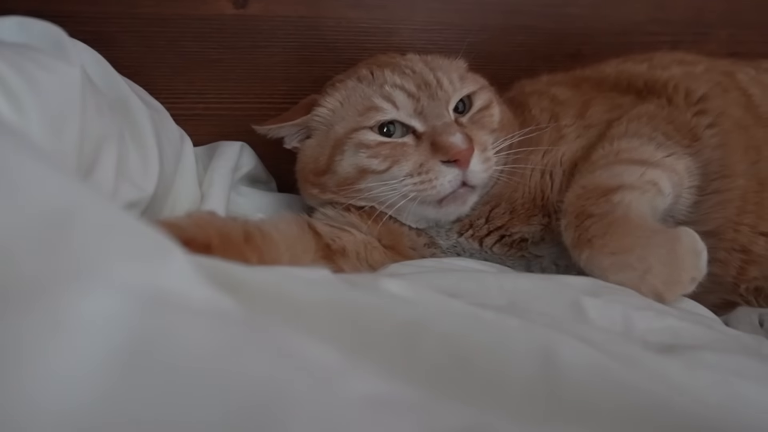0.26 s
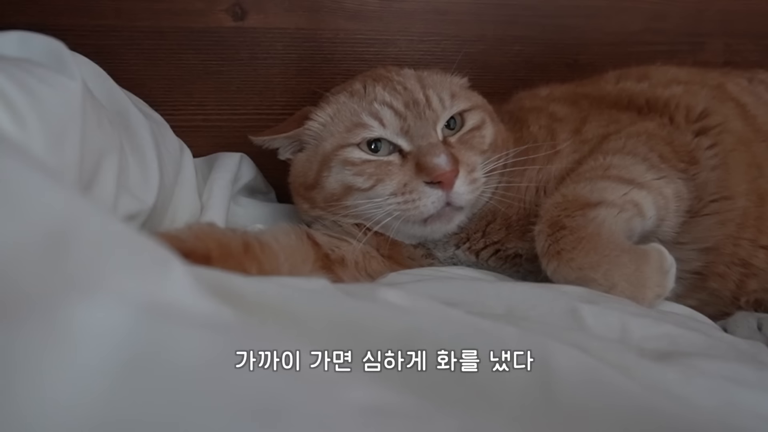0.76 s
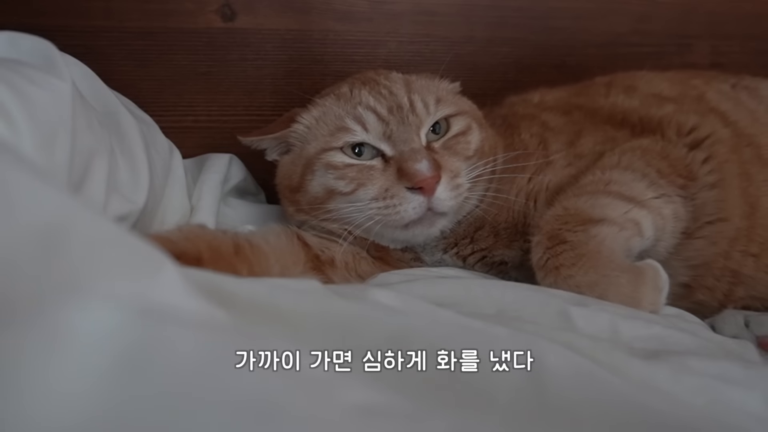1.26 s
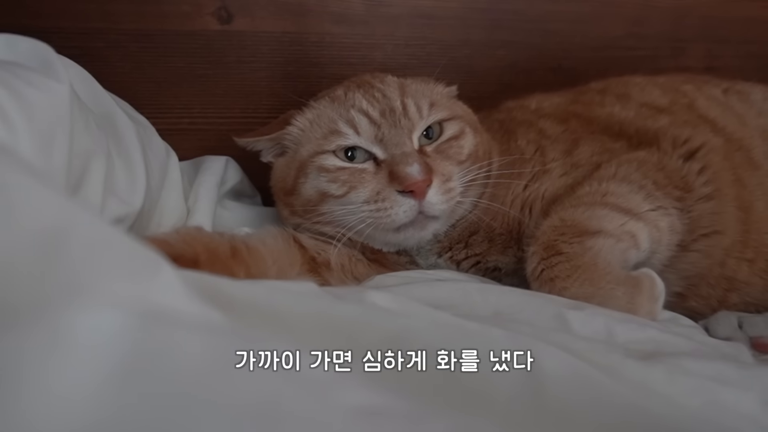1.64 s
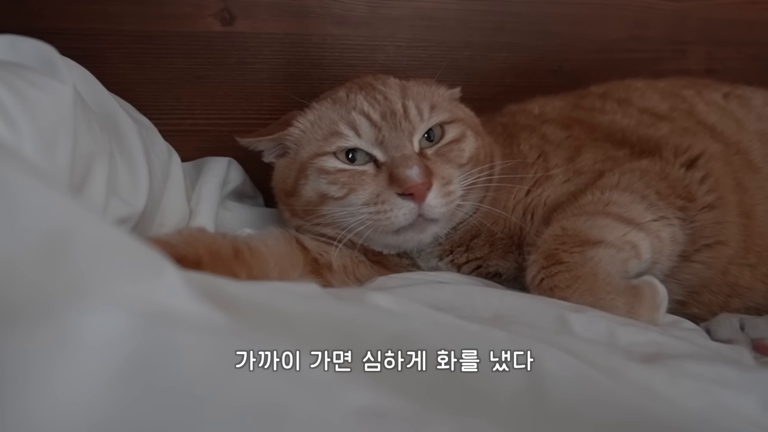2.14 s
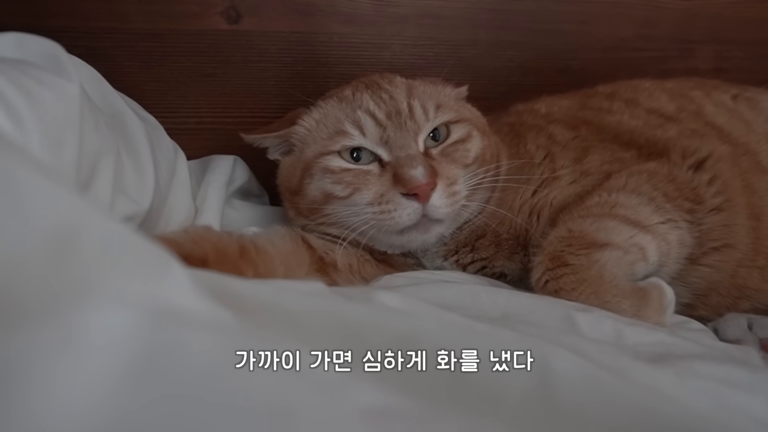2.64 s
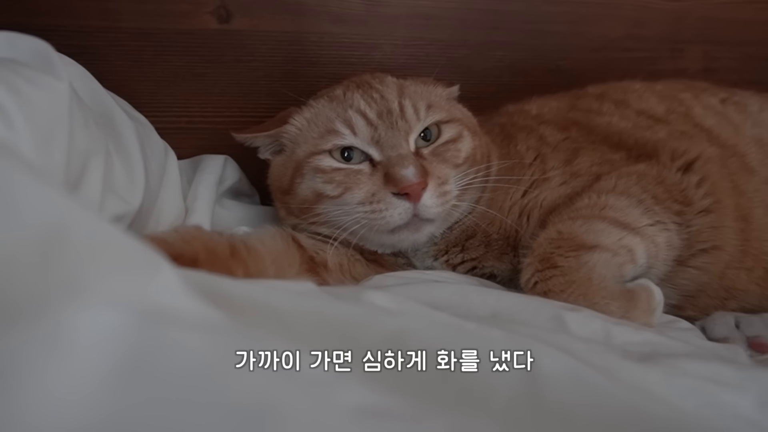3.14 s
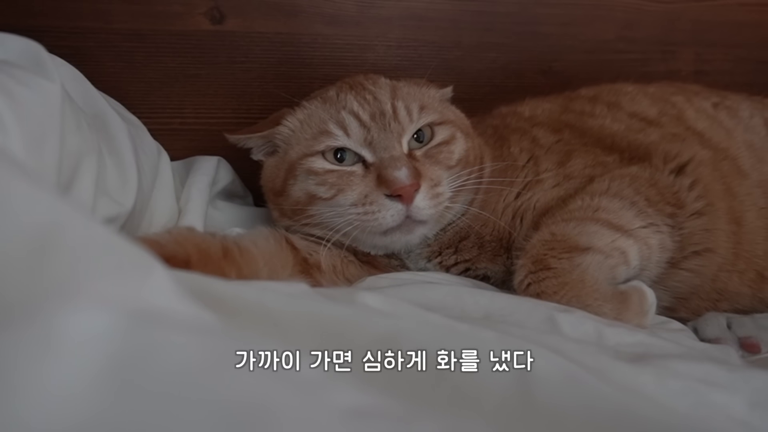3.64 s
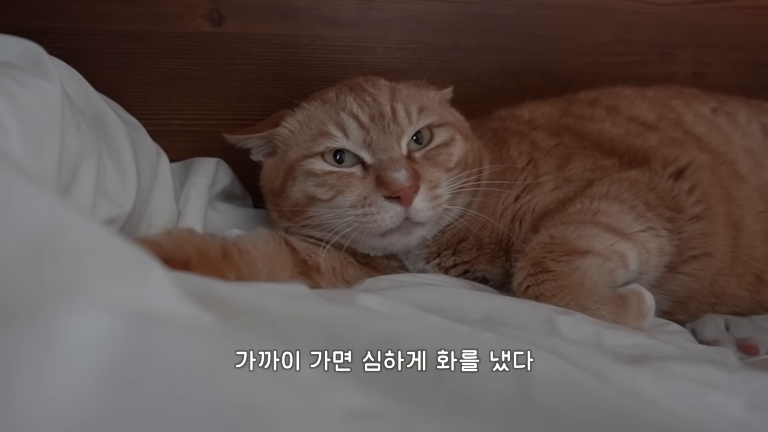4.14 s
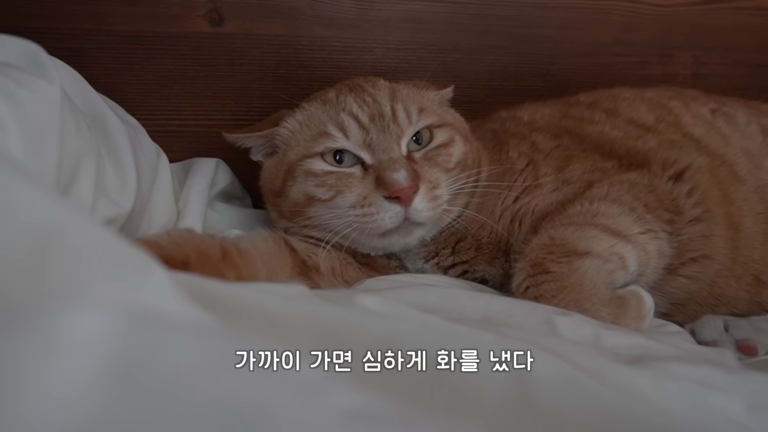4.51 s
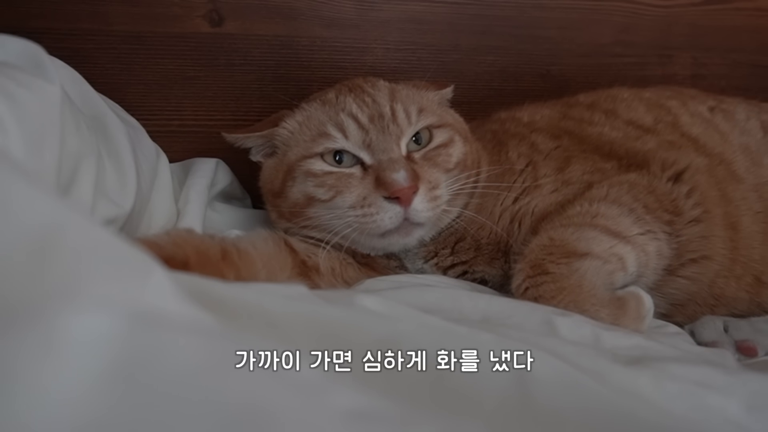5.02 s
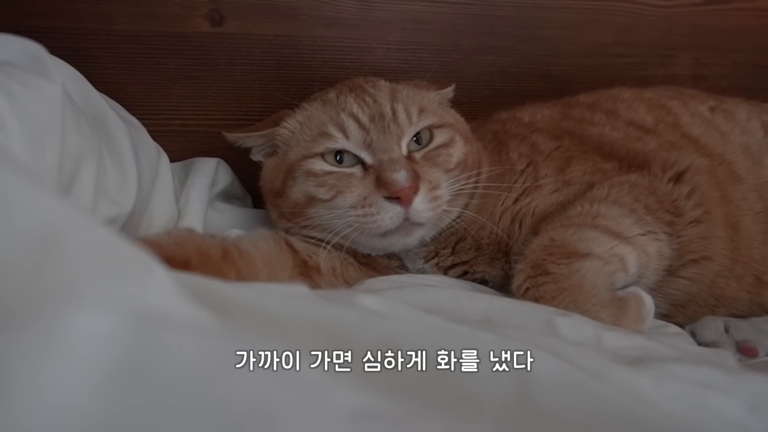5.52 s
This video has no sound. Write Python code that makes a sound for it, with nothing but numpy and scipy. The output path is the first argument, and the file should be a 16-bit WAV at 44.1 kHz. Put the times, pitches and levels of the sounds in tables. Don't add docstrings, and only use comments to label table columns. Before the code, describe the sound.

An angry cat close by yowls high and harsh, slides down into a long low throaty growl, then stops abruptly in a quiet bedroom.

```python
import sys
import numpy as np
from scipy import signal
from scipy.fft import rfft, irfft, next_fast_len
from scipy.io import wavfile

SR = 44100
rng = np.random.default_rng(int(sys.argv[2]) if len(sys.argv) > 2 else 0)


def output_pcm(signal):
    pcm = np.clip(np.atleast_2d(signal).T, -1, 1) * 32767
    wavfile.write(sys.argv[1], SR, np.round(pcm).astype(np.int16))


def nominal_scale(level):
    x = np.asarray(level, float) / 20
    return 10 ** x


N = 254456
LONG = next_fast_len(N)
HZ = np.maximum(np.fft.rfftfreq(LONG, 1 / SR), 1)

# pitch_hz, level_db
MOUTH_SHUT = [(40, -27), (200, -2), (480, -13.5), (570, -34), (670, -11), (830, -66), (1050, -28),
              (1250, -45.5), (1500, -76), (2400, -58.5), (2850, -49), (3500, -71.5), (4200, -58),
              (5500, -83), (6600, -58), (7500, -78), (16000, -74)]
MOUTH_NARROW = [(120, -37), (200, -7), (275, 3.5), (397, 1), (443, 3), (660, -3), (908, -5), (1460, -21.5),
                (2360, -43), (3300, -36.5), (4260, -39.5), (5150, -51), (9000, -48), (11700, -57),
                (19800, -120)]
MOUTH_HALF = [(120, -48), (200, 1.5), (271, -17), (366, -32), (490, -6.5), (704, 0.5), (852, -7),
              (1200, -1), (1400, -31.5), (1950, -32), (2430, -13.5), (3000, -29), (3750, -35), (4600, -41),
              (5250, -29.5), (6300, -32.5), (7500, -44.5), (16000, -54)]
MOUTH_WIDE = [(120, -64), (200, -7.5), (600, -12), (908, -3), (1250, 3.5), (1510, -10.5), (1980, -35),
              (2520, -8), (3630, -33), (4610, -37), (5670, -11.5), (6650, -25), (7550, -45), (9000, -42),
              (11700, -64), (19800, -120)]
LIPS_DRAWN = [(180, -44), (300, -1.5), (460, -12.5), (695, -5), (860, -22), (1060, -3.5), (1360, 11),
              (1730, -28), (2840, -7.5), (3320, -31), (4230, -35), (5470, -20.5), (9000, -67), (11700, -77),
              (19800, -120)]
# time_s, position (0 shut, 1 narrow, 2 half, 3 wide, 4 lips drawn)
MOUTH = [
    (0, 3.73),
    (.3, 3.64),
    (.5, 2.77),
    (.66, 2.48),
    (.82, 1.93),
    (1.14, 1.48),
    (1.3, 0.72),
    (1.45, 0.43),
    (1.68, 0.14),
]
# time_s, pitch_hz
PITCH = [(0, 418.6), (.1, 440.5), (.112, 472), (.28, 612.5), (.63, 601), (.655, 553.6), (.75, 556.5),
         (1.15, 467.9), (1.29, 348), (1.315, 355.5), (1.352, 274), (1.45, 245), (1.7, 170.3), (1.97, 123.4),
         (2.6, 124.1), (3.1, 90.14), (3.95, 92.98), (4.2, 103)]
# time_s, slip_hz, half_width_s
PITCH_SLIPS = [(.155, -28, .025), (.2, 6, 0.01977), (.485, 22, 0.01513), (.525, -12, 0.01804),
               (.56, 9, 0.01497), (.69, -15, 0.034), (1.09, -16, 0.041), (1.195, -16, 0.014),
               (1.24, 10, 0.0114), (1.275, -22, 0.0154), (1.4, 12, 0.0197), (2.67, 45, .028),
               (2.73, 39, .035)]
# time_s, level_db
EFFORT = [(0, -41), (.1, -43), (.2, -46), (.285, -37), (.31, -39), (.4, -43), (.465, -41), (.485, -38),
          (.63, -35.5), (.66, -36), (1.15, -37.5), (1.65, -31), (1.85, -34.5), (2.0, -28), (2.6, -31.5),
          (2.75, -36.5), (3.95, -36.5), (4.17, -50.5)]
# time_s, change_db, half_width_s
CATCHES = [(0.37, 2, 0.002), (0.404, 0, 0.006), (.417, 9, 0.0085), (.345, -1, 0.0045), (.431, 3, 0.0034),
           (.462, 0, 0.0065), (0.444, 3, 0.0074), (.6, 1.5, 0.0076), (.609, -14.5, 0.0023),
           (.624, 2.5, 0.012), (.965, -2.5, 0.03), (1.265, 2, 0.013), (2.7, -3, 0.027)]

# first_db, second_db, third_db, upper_harmonics_db, second_beat_db
WHINE, PINCH, SCREAM = (4, 2, -6.2, -4.5, -25), (4.5, -4.5, -9, 1.3, -40), (-3.5, 7, 10, -1.5, -19)
DOUBLED, MOAN, MURMUR = (-10, -8, 13.5, -4, 7.5), (7.5, 1, 12.5, 7, -2), (9, -26, -4, -10.1, 1.5)
SLIDE, SINK, CRACK = (4.7, -12, -2, -3.5, -26), (6.5, 1.5, -3.5, 4.5, -29), (-1.5, 8, 4.5, 0, -13)
GROWL, FLIP = (9.5, 2.5, 7, -0.4, -26), (5.5, 7, 0, 1, -20.5)
SAG, RUMBLE = (13.5, 7.5, 3, -2.5, -4.5), (14.5, 4.5, -29, -0.5, 5.5)
SQUEEZE, SHRIEK = (-7.5, -10, -2, 4.5, -40), (-7, -1.5, 7.5, 0.5, -12)
SPLIT, DYING = (-2.5, -0.5, -1, -2, 4.3), (20, 11.5, 7, 0, 2)
TURNING = (-16, -3, 9, 2.1, 7.5)
PURE, CLEAR, HUSKY, HOARSE = (.06, .08), (.04, .15), (.2, .3), (.34, .4)
LOOSE, TORN, EVEN, GRUFF = (.09, 1.2), (.2, .95), (.1, .5), (.14, .6)
# start_s, change_over_s, breath_db (over effort), closing, steadiness
STAGES = [(0, .01, -12.5, WHINE, CLEAR), (.104, 0.0063, -15, PINCH, CLEAR),
          (.172, 0.011, -15, SQUEEZE, CLEAR), (.23, 0.057, -10, SCREAM, CLEAR),
          (0.296, 0.012, -3, SHRIEK, HOARSE), (0.474, .015, -6, SCREAM, HUSKY),
          (0.633, 0.0086, -6, TURNING, EVEN), (.72, 0.026, -10.5, DOUBLED, PURE),
          (0.838, 0.018, -15, SPLIT, HUSKY), (0.923, 0.026, -23, MOAN, PURE),
          (0.989, 0.12, -16, MURMUR, PURE), (1.115, 0.059, -27, SLIDE, LOOSE),
          (1.38, 0.075, -36, SINK, LOOSE), (1.675, .04, -34, CRACK, TORN),
          (1.79, 0.087, -36.5, GROWL, EVEN), (2.643, 0.011, -30, FLIP, LOOSE),
          (2.748, 0.036, -27, SAG, GRUFF), (2.98, .11, -25, RUMBLE, EVEN), (3.97, 0.22, -14, DYING, EVEN)]

# time_s, ratio
BEAT_RATIO = [
    (0, .5),
    (2.97, .5),
    (3.08, .627),
    (3.75, .63),
    (4.15, .55),
]
# pulse_rate_hz, level_db
UNDER_TONE = [(140, -8), (200, -25), (440, -20), (470, 0)]
# pulse_rate_hz, phase_rad
PULSE_LEAN = [(95, .4), (122, -1.4)]
# time_s, second_beat_db, half_width_s
DOUBLINGS = [
    (.975, -6, .025),
    (1.575, 12.5, 0.015),
    (2.18, 17.5, 0.15),
    (2.4, 19.5, 0.04),
    (2.57, 21.5, 0.028),
]

# pitch_hz, level_db
SIDE_LEVEL = [(400, 0), (750, -1), (1250, -6), (1700, -2), (2500, -1.5), (5000, -1), (9000, 0)]
# pitch_hz, phase_rad
SIDE_PHASE = [(400, 0), (1030, -.5), (1550, -.6), (1810, .4), (4050, -.1), (4650, -.8), (5340, .6),
              (6460, -.3), (9000, 0)]
# pitch_hz, level_db (per Hz)
ROOM_HUM = [(12, -48), (20, -11), (36, -9), (54, 3.5), (175, -21), (232, -15.5), (324, -23.5), (520, -21.5),
            (565, -24), (768, -25), (1100, -27.5), (1980, -33), (15500, -44)]
# pitch_hz, likeness (-1 to 1)
ROOM_LIKENESS = [(60, 0.99), (130, 0.98), (290, 0.58), (640, -0.092), (1410, -0.21), (3100, -0.17),
                 (6820, 0.015), (15000, 0.049)]
# time_s, swell_db, half_width_s
RUMBLE_SWELLS = [
    (.3, 8, 0.36),
    (.96, 11.3, 0.21),
    (3.0, 8.7, 1.6),
    (5.8, 4.65, 0.27),
]

# time_s, pitch_hz, level_db
TONGUE = [(.72, 5500, -75), (.8, 5260, -58), (.92, 4780, -64), (1.02, 4400, -70), (1.12, 4300, -60),
          (1.24, 4250, -62), (1.3, 4250, -83)]
# time_s, level_db, spread_s
SMACKS = [
    (1.108, -53.5, 0.014),
    (1.262, -58, 0.0075),
    (1.315, -57, 0.035),
]
# time_s, pitch_hz, level_db
NOSE = [
    [(2.49, 6785, -68), (2.516, 7270, -60), (2.584, 6860, -64), (2.616, 8100, -65), (2.72, 6906, -64),
     (2.74, 7260, -79)],
    [(2.77, 6365, -73), (2.806, 6281, -65), (2.83, 6500, -73), (2.84, 7160, -74)],
]


def rms_one(x):
    return x / np.sqrt(np.mean(x ** 2) + 1e-20)


def in_time(rows):
    s, *columns = np.transpose(rows)
    return [np.interp(np.arange(N) / SR, s, c) for c in columns]


def at_hz(points, hz):
    point_hz, value = np.array(points).T
    return np.interp(np.log(hz), np.log(point_hz + 1e-3), value)


def band(x, low_hz, high_hz):
    return signal.sosfilt(signal.butter(3, [low_hz, high_hz], "band", fs=SR, output="sos"), x)


def shaped(spectrum, gain):
    return irfft(spectrum * gain, LONG)[..., :N]


def drift(hz):
    r = np.exp(-2 * np.pi * hz / SR)
    noise = rng.standard_normal(N + SR)
    return rms_one(signal.lfilter([1], [1, -2 * r, r * r], noise)[SR:])


def bumps(rows):
    t = np.arange(N) / SR
    return sum(size * np.exp(-((t - s) / width) ** 2) for s, size, width in rows)


def staged():
    points = []
    was = None
    for start_s, change_over_s, breath_db, closing, steadiness in STAGES:
        now = (breath_db, *closing, *steadiness)
        points.append((start_s, *(was or now)))
        points.append((start_s + change_over_s, *now))
        was = now
    return in_time(points)


def mouth_shares(mouth):
    mouth = np.clip(mouth, 0, 4)
    return [np.clip(1 - np.abs(mouth - k), 0, 1) for k in range(5)]


def fold_tones(hz, ratio, turn, beat, levels_db, wander, mouths):
    first, second, third, upper, beat_db = levels_db
    step = np.arange(0, N, 32)
    part = ratio[step]
    lean, under_db = at_hz(PULSE_LEAN, hz), at_hz(UNDER_TONE, hz)[step]
    smear = [wander * drift(29.0) for _ in range(4)]
    flicker_db = [2.5 * drift(10) [step] for _ in range(3)]

    doubling_db = bumps(DOUBLINGS)
    beat_db = (beat_db + doubling_db)[step]
    second, third = second - 0.3 * doubling_db, third - 0.3 * doubling_db
    harmonic_db = [level[step] for level in (first, second, third, upper)]
    free = np.clip((part - .5) * 10, 0, 1)

    def throat_db(multiple):
        return sum(share[step] * at_hz(shape, multiple * hz[step]) for share, shape in mouths)

    def tone(level_db, phase):
        return np.interp(np.arange(N), step, nominal_scale(level_db)) * np.cos(phase + lean)

    tones = 0
    for k in range(15):
        phase = k * turn + np.sqrt(max(k - 2, 0)) * smear[k % 4] - 0.25 * max(k - 3, 0) ** 1.37
        if k:
            level_db = harmonic_db[min(k, 4) - 1] + throat_db(k)
            tones = tones + tone(level_db + (k > 1) * flicker_db[k % 3], phase)
        above_db = under_db if k == 0 else -3.0 * (k - 1) * free
        tones = tones + tone(beat_db + throat_db(k + part) + above_db, phase + beat)
        if k > 1:
            below_db = -(4.0, 1.0, 6.0)[min(k - 2, 2)] - 1.06 * k - 60 * (1 - free)
            tones = tones + tone(beat_db + throat_db(k - part) + below_db, phase - beat)
    return np.sqrt(2) * tones


def airy(shape):
    level_db = at_hz(shape, HZ)
    return nominal_scale(np.maximum(level_db, level_db[HZ > 2000].max() - 40.0))


def rasp_and_breath(hz, turn, beat, mouths):
    puffs = (2.1 + np.cos(turn - .8)) * nominal_scale(np.cos(beat) + 1.3 * drift(20.))
    air = rfft(rng.standard_normal(N) * puffs, LONG)
    low = np.clip((1900 - HZ) / 300, 0, 1)
    high = np.clip((HZ - 1600) / 300, 0, 1)
    rasp = sum(share * rms_one(shaped(air, low * nominal_scale(at_hz(shape, HZ)))) for share, shape in mouths)
    bottom = shaped(rfft(rasp, LONG), np.clip((230 - HZ) / 70, 0, .9))
    rasp = rasp - np.clip((hz - 130) / 50, 0, 1) * bottom
    breath = sum(share * rms_one(shaped(air, high * airy(shape))) for share, shape in mouths)
    return rasp, breath


def voice():
    hz = in_time(PITCH)[0] + bumps(PITCH_SLIPS)
    hz = hz * (1 + .006 * drift(9) * (hz < 135))
    effort_db, mouth, ratio = [in_time(rows)[0] for rows in (EFFORT, MOUTH, BEAT_RATIO)]
    breath_db, *closing_db, rough, wander = staged()
    shapes = (MOUTH_SHUT, MOUTH_NARROW, MOUTH_HALF, MOUTH_WIDE, LIPS_DRAWN)
    mouths = list(zip(mouth_shares(mouth), shapes))

    turn = 2 * np.pi * np.cumsum(hz) / SR + .8 * rough * drift(60.)
    beat = 2 * np.pi * np.cumsum(hz * ratio) / SR + 1.5 * rough * drift(25.)
    tones = fold_tones(hz, ratio, turn, beat, effort_db + np.array(closing_db), wander, mouths)
    tones = tones * nominal_scale(rough * (3.1 * drift(50.0) + 1.7 * drift(130.0)))

    rasp, breath = rasp_and_breath(hz, turn, beat, mouths)
    patchy_db = 14.5 * np.tanh(drift(25.0))
    rasp_db = -11 + rough * (42 + patchy_db)
    air = nominal_scale(effort_db) * (nominal_scale(rasp_db) * rasp + nominal_scale(breath_db) * breath)
    ending = np.clip((4.185 - np.arange(N) / SR) / 0.046, 0, 1)
    return ending * nominal_scale(bumps(CATCHES)) * (tones + air)


def bedroom(x):
    t60_s = .14
    t = np.arange(int(.3 * SR)) / SR
    noise = rng.standard_normal((2, len(t)))
    tail = band(noise, 595, 11600) * nominal_scale(-60 * t / t60_s) * (t > .004)
    tail = tail / np.sqrt(np.sum(tail ** 2) / 2)
    return signal.fftconvolve(x[None], tail, axes=1)[:, :N]


def room_tone():
    mid, side = rfft(rng.standard_normal((2, LONG))) * nominal_scale(at_hz(ROOM_HUM, HZ))
    alike = np.clip(at_hz(ROOM_LIKENESS, HZ), -1, 1)
    both = shaped(np.sqrt(1 + alike) * mid + np.sqrt(1 - alike) * side * [[1], [-1]], 1)
    air = nominal_scale(-53.5) * rms_one(band(both, 90.3, 21000))
    rumble = rms_one(band(rng.standard_normal(N), 38, 55.5))
    return rumble * nominal_scale(-57 + bumps(RUMBLE_SWELLS)) + air


def tongue():
    hz, level_db = in_time(TONGUE)
    width_hz = 160
    turn = 2 * np.pi * np.cumsum(hz) / SR
    return nominal_scale(level_db) * (drift(width_hz) * np.cos(turn) + drift(width_hz) * np.sin(turn))


def smacks():
    t = np.arange(N) / SR
    shape = sum(nominal_scale(db) * np.exp(-((t - s) / spread) ** 2 * 4) for s, db, spread in SMACKS)
    grains = rng.standard_normal(N) * nominal_scale(2.7 * drift(360.0))
    return shape * band(grains, 2500, 15000)


def nose():
    t = np.arange(N) / SR
    out = 0
    for rows in NOSE:
        hz, level_db = in_time(rows)
        start_s, end_s = rows[0][0], rows[-1][0]
        gate = np.clip(np.minimum(t - start_s, end_s - t) / 0.0099, 0, 1)
        turn = 2 * np.pi * np.cumsum(hz * (1 + 0.061 * drift(400.))) / SR
        whistle = np.sin(turn) + nominal_scale(-8.0) * (t > 2.58) * np.sin(2 * turn)
        out = out + gate * nominal_scale(level_db + 1.0 + 0.95 * drift(40.)) * whistle
    return out


def scene():
    cat = voice() + tongue() + smacks() + nose()
    half = nominal_scale(at_hz(SIDE_LEVEL, HZ) / 2) * np.exp(.5j * at_hz(SIDE_PHASE, HZ))
    pair = np.array([half, 1 / half])
    direct = shaped(rfft(cat, LONG), pair / np.abs(pair.mean(axis=0)))
    return direct + nominal_scale(-16) * bedroom(cat) + room_tone()


def roll_off(x):
    return signal.sosfilt(signal.butter(12, 15680, fs=SR, output="sos"), x)


def record(dry):
    return roll_off(dry)


dry = scene()
out = record(dry)
output_pcm(out)
```